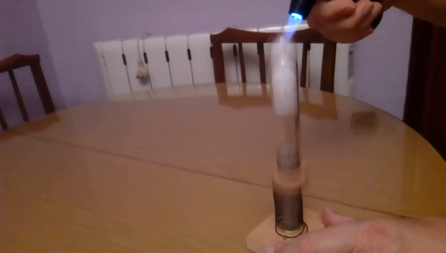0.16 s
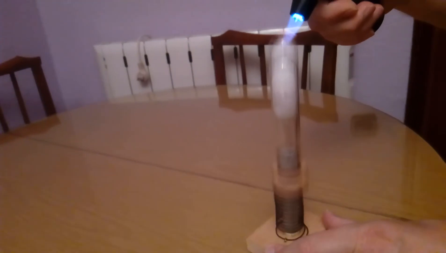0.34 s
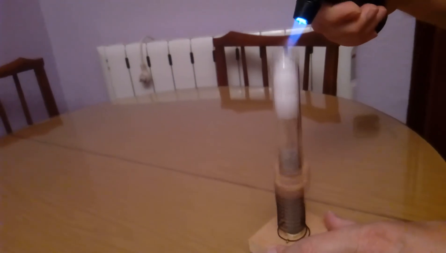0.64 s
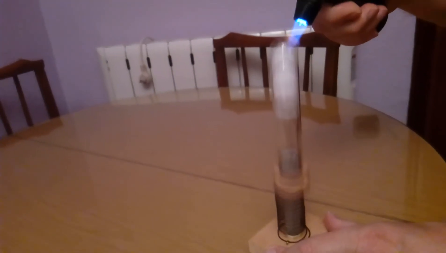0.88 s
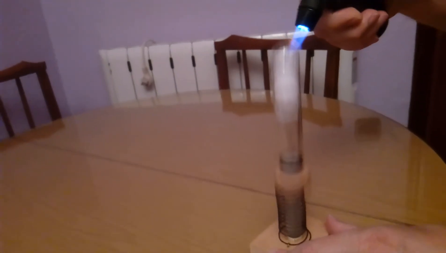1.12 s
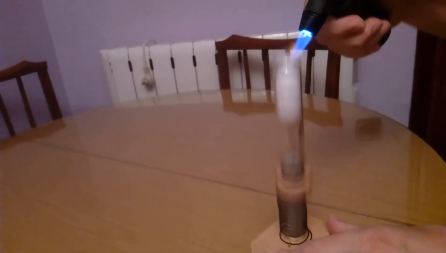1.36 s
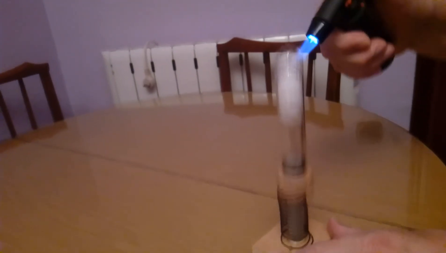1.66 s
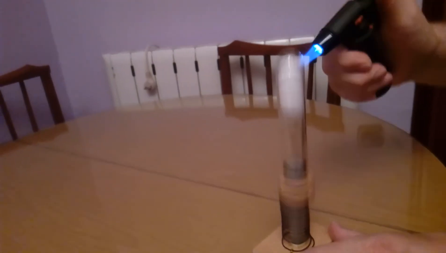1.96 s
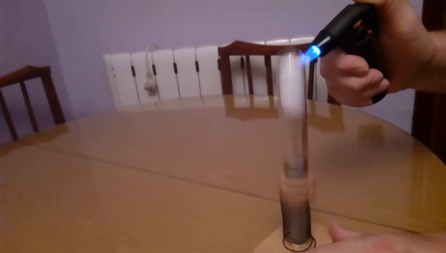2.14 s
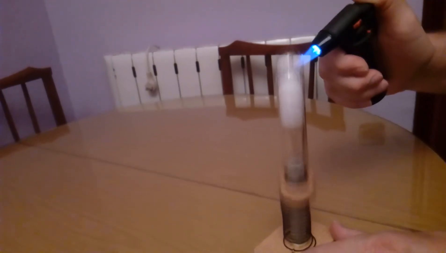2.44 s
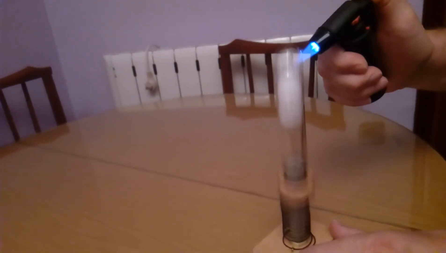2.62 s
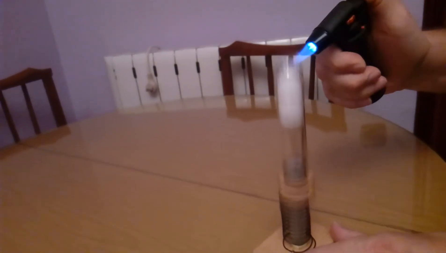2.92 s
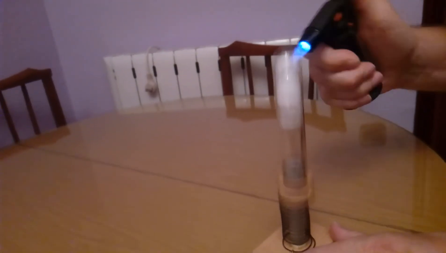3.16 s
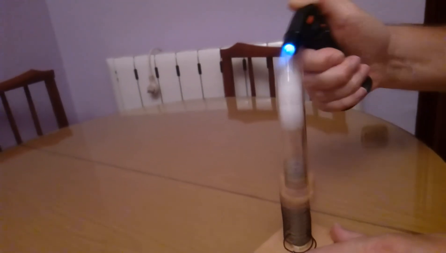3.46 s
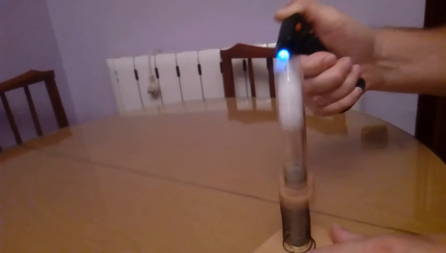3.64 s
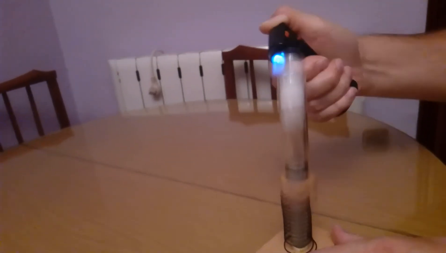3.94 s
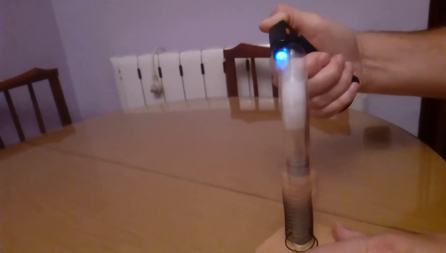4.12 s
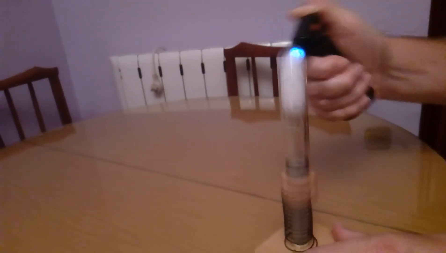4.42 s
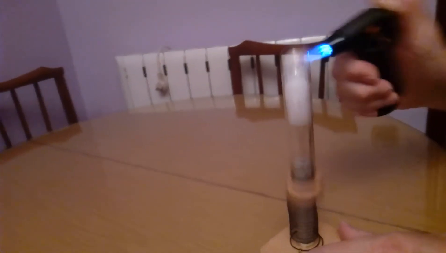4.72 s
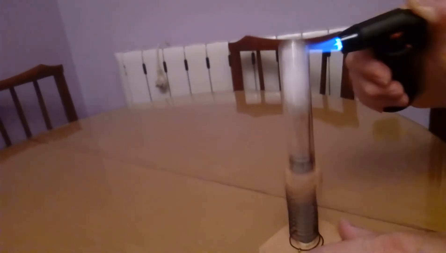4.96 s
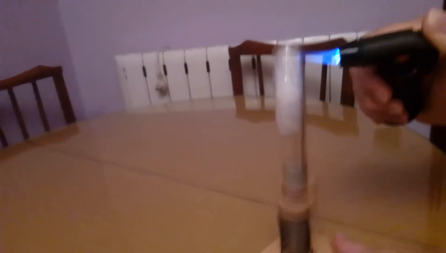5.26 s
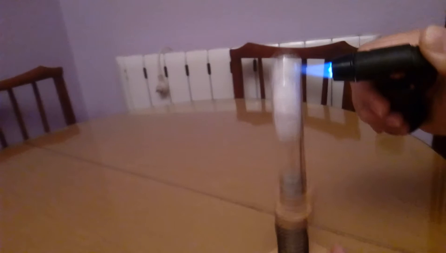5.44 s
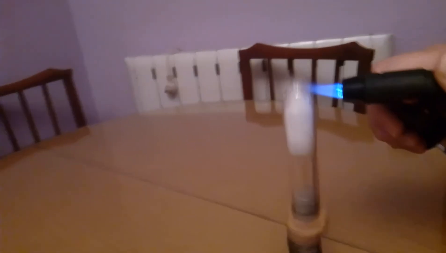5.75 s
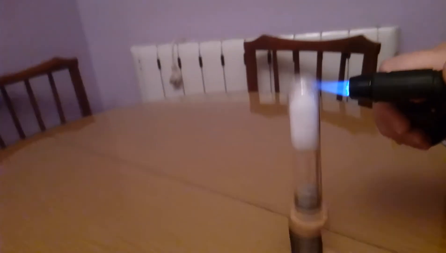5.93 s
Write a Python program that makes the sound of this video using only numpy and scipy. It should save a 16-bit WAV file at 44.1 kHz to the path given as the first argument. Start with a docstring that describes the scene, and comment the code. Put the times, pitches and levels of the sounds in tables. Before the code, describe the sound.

Rapid, dry, glassy clattering from a tiny free-piston engine on a wooden table, steady and very close, with faint gas flame hiss behind.

```python
"""A small room: a free-piston hot-air engine of glass tubes runs on a wooden table, heated by a hand torch.
Eleven times a second the piston slams one end stop, knocks the other and ticks the glass as it rebounds.
Each blow rings decaying modes of tube, base and table; random grains into the same modes make the scrape.
Echoes are decaying noise, the torch is shaped noise, the low hum is three wavering bands. Two close microphones."""
import sys
import numpy as np
from scipy import signal
from scipy.fft import rfft, irfft
from scipy.io import wavfile
from scipy.ndimage import uniform_filter1d

SR = 44100
rng = np.random.default_rng(int(sys.argv[2]) if len(sys.argv) > 2 else 0)


def voltage_ratio(decibels):
    """Convert decibels (scalar or array-like) to amplitude ratios, 20 dB per decade."""
    exponent = np.asarray(decibels, float) / 20
    return 10 ** exponent


def unload_wav(signal):
    """Save mono or channel-first audio to the path in sys.argv[1] as 16-bit WAV at rate SR, clipped to [-1, 1]."""
    wavfile.write(
        sys.argv[1],
        SR,
        np.round(np.clip(np.atleast_2d(signal).T, -1, 1) * 32767).astype(np.int16),
    )


N = 269010
LEFT_LAG_S = 5.5e-5

# blows on the upper stop:
# (time [s], level [dB], crack 2.9-5.3 kHz [dB re level], top ping [dB re level])
UPPER_STOP_BLOWS = [(0.0226, -22.2, -5, -5), (0.1121, -14, 1, -9), (0.2031, -19.5, 0.3, -10),
                    (0.2936, -17, -5.5, -14), (0.384, -20, 0.5, -8), (0.4767, -18, 1.5, -6.5),
                    (0.5674, -13.5, -3, -10.5), (0.6602, -17.5, 0.5, -6.1), (0.7517, -15.5, -8, -24),
                    (0.8452, -19.5, 0.5, -10), (0.9347, -12, -10, -17), (1.0271, -19.5, 1, -3.5),
                    (1.1166, -18, 2, -5), (1.2073, -17.5, 1, -2.5), (1.2959, -17.5, 0.5, -3.5),
                    (1.3887, -18, 0.6, -4), (1.477, -16.5, -1.0, -8), (1.5693, -15.5, -16, -16.8),
                    (1.6628, -16.5, -0.4, -11), (1.752, -13, -12, -22), (1.8438, -15, -7, -15),
                    (1.9394, -15.5, -4, -13), (2.028, -14.5, -1.3, -10.5), (2.1171, -14, 0.2, -14),
                    (2.2086, -20.5, -1.5, -13), (2.3036, -20, -4, -16), (2.392, -21.5, -3, -16),
                    (2.4832, -13, -3.0, -8.5), (2.5739, -17, -1, -14), (2.6633, -21, 2.4, -4.2),
                    (2.7582, -18, 2.3, -6), (2.8511, -15, -19.2, -15.3), (2.9454, -18, 0.5, -16),
                    (3.032, -20, 1.8, -7), (3.123, -19.1, 2, -8.3), (3.2138, -21.7, -1.5, -9),
                    (3.3038, -14.5, -10.5, -18), (3.3938, -19.5, 0.8, -8.5), (3.4853, -12.5, -0.5, -11.2),
                    (3.5798, -13, -5, -14.5), (3.6701, -21, 1.9, -1.4), (3.7613, -26.5, 1.1, -6),
                    (3.8529, -18, 1.4, -8), (3.9419, -19, -0.5, -2.5), (4.0327, -12, -3.5, -10),
                    (4.125, -17.1, 1.3, -7.5), (4.2172, -17.5, 1.6, -5.5), (4.3065, -15.5, -12, -34.7),
                    (4.398, -17.5, -2, -17), (4.4917, -15, -3, -19.5), (4.5834, -18, -0.5, -10),
                    (4.6758, -14.0, 0, -11), (4.768, -20.5, 0, -11), (4.8568, -14.5, -6, -14.4),
                    (4.9465, -21, 2.0, -6), (5.0383, -17.5, 0.7, -4.8), (5.1299, -18, 1.8, -5),
                    (5.221, -16, -2.5, -10), (5.3108, -18.5, 2, 1), (5.4031, -18.5, 1.5, -0.5),
                    (5.4966, -22, -1, -7), (5.5907, -22, 1.5, 3), (5.6816, -19, 0.9, 2.1),
                    (5.7781, -21.5, 0.5, 0), (5.87, -22, -2, -6), (5.9603, -22, 0.5, -10),
                    (6.0533, -22, -5.7, -10)]


def slams():
    """Upper-stop times and band levels; thud and glass grow less than the blow, a dull blow rings less glass."""
    time_s, level_db, crack_db, ping_db = np.transpose(UPPER_STOP_BLOWS)
    thud_db, glass_db = colours(len(time_s), (-3.5, 3.4), (-11.5, 3.2))
    above_usual_db = level_db + 17.5
    thud_db = thud_db - 0.33 * above_usual_db
    glass_db = glass_db - 0.15 * above_usual_db + 0.22 * crack_db
    return time_s, (level_db + np.array([thud_db, 0 * time_s, crack_db, glass_db, ping_db])).T


# blows on the lower stop, each with its rebound on the glass:
# (time [s], level [dB], rebound delay [ms], rebound glass level [dB])
LOWER_STOP_BLOWS = [(0.0578, -29.5, 8.5, -33), (0.1488, -30, 6.9, -29), (0.2392, -31, 9.8, -31),
                    (0.3334, -30.5, 5.8, -30), (0.4239, -30, 3.3, -31), (0.5132, -31.5, 2.9, -36.9),
                    (0.607, -32, 5.7, -33.2), (0.6951, -32.5, 6.2, -29), (0.7896, -31.5, 2.2, -33.5),
                    (0.8782, -32, 3.2, -26), (0.9706, -31, 6.5, -35.5), (1.0598, -34.5, 6.8, -23),
                    (1.153, -29.5, 1.9, -29.4), (1.2415, -31, 4.9, -21.5), (1.3336, -29, 3, -29),
                    (1.4237, -35, 3.6, -20), (1.516, -31.5, 1.9, -30), (1.6068, -28.5, 3.1, -35),
                    (1.6963, -34, 3.3, -23.5), (1.7891, -29.2, 2.7, -22.9), (1.879, -31, 5.7, -29),
                    (1.9705, -34, 1.8, -41), (2.0618, -32.5, 11.3, -26), (2.1532, -33, 1.96, -27.5),
                    (2.2465, -28, 2.15, -24), (2.3374, -33, 2.9, -44), (2.4292, -33, 2.0, -51),
                    (2.519, -32.5, 2.0, -39.8), (2.6131, -31, 5.2, -25.5), (2.7029, -32.8, 2.8, -30),
                    (2.7928, -31.5, 7.5, -28.5), (2.885, -33, 6.1, -35), (2.9771, -32, 10.8, -42),
                    (3.068, -29, 3.45, -26.5), (3.1592, -33, 4.2, -23.5), (3.2506, -30.5, 8, -43.6),
                    (3.3435, -32.5, 5.6, -30.3), (3.4343, -30.0, 6.3, -27), (3.524, -33.5, 2.2, -29),
                    (3.6156, -28.9, 2.5, -25.5), (3.7067, -33.5, 10.1, -24.5), (3.7986, -31.5, 3.9, -25.5),
                    (3.8872, -32, 6.5, -25), (3.9796, -32, 6.9, -30), (4.0726, -32.5, 6.5, -27.8),
                    (4.1642, -27.5, 1.9, -26.5), (4.2558, -27.5, 7.1, -25.5), (4.348, -31, 2.6, -35.1),
                    (4.44, -32, 6.6, -33), (4.5314, -32.5, 5.1, -36), (4.6211, -31.5, 6.3, -26.5),
                    (4.7099, -34.5, 7.0, -26.5), (4.8034, -32.5, 10.5, -23), (4.8969, -30, 5.9, -22.5),
                    (4.9876, -32, 3.6, -27.5), (5.0798, -31, 5.4, -27.5), (5.1712, -27, 6.2, -27),
                    (5.2626, -27, 3.5, -26), (5.3542, -30.5, 1.9, -33.3), (5.446, -29, 4.1, -28),
                    (5.5355, -31.5, 2.3, -36), (5.6247, -30.5, 3.65, -27.3), (5.719, -32, 2.4, -23.5),
                    (5.8092, -32, 6.4, -27.5), (5.901, -35.5, 2.2, -44), (5.9935, -32, 10, -37),
                    (6.0855, -33.5, 4.1, -34.5)]


def knocks():
    """Lower-stop times and band levels."""
    time_s, level_db = np.transpose(LOWER_STOP_BLOWS)[:2]
    thud_db, crack_db, glass_db, ping_db = colours(len(time_s), (0, 2.26), (-6.5, 4.3), (-9, 5), (-10.5, 4.3))
    return time_s, (level_db + np.array([thud_db, 0 * time_s, crack_db, glass_db, ping_db])).T


def rebounds():
    """Times and band levels of the glass ticks, a few ms after each knock."""
    time_s, _, delay_ms, glass_db = np.transpose(LOWER_STOP_BLOWS)
    crack_db, ping_db = colours(len(time_s), (-7.5, 3.95), (-19, 3))  # re glass level
    bands_db = np.array([crack_db, crack_db, crack_db, 0 * time_s, ping_db])
    return time_s + delay_ms / 1000, (glass_db + bands_db).T


def colours(count, *rules):
    """One random dB offset per blow for each (mean dB, scatter dB) rule."""
    mean_db, scatter_db = np.transpose(rules)
    return (mean_db + scatter_db * rng.standard_normal((count, len(rules)))).T


# borders of the five bands thud, body, crack, glass, ping: (frequency [Hz])
BAND_BORDERS_HZ = [1450, 2900, 5350, 8000]
# ringing modes of tube, base and table:
# (frequency [Hz], t60 [ms], left minus right level [dB], left minus right phase [rad],
#  slam gain [dB], knock gain [dB], tick gain [dB])
MODES = [(783, 4.2, -6, 0.09, -6.5, 12, 3.5), (1163, 31, -2, -0.0051, -37, -6.5, -4.5),
         (1330, 4.92, -1.5, -0.32, -1, 19.5, -21), (1780, 6.4, 7, -0.18, 3, 9.5, 8),
         (2179, 4.59, -0.5, -0.21, 16, 11, 12), (2463, 3.05, -1, 0.22, 8.5, 23, -2),
         (3382, 3.66, -8, 0.12, 13.5, 13, -23), (4000, 2.32, 6, 0.14, 16.5, 18, -20),
         (4780, 2.8, 7, 1.4, 9.5, 22, -13), (5361, 5.57, 0, 0.069, 10, 11.5, 4),
         (5874, 24.7, 8, -0.16, 3.5, -23, 4), (7500, 2.1, 13.5, -0.88, 0.5, -1, -4),
         (9836, 3.54, -1, -0.13, 14.5, 17, 6), (12770, 4.7, -12, -0.69, -9.5, 4, -8)]
# slams in which the piston lands on two edges in turn: (time [s])
TWO_EDGE_SLAMS_S = [.112, .567, 2.028, 2.117, 2.945, 3.58, 4.676]


def blows(times_s, bands_db, column, early_ms, push_ms, touch_ms, touch_db, bounce_ms, bounce_db, doubles_s=()):
    """Each blow rings the modes in its own balance, between a lighter first touch and a small bounce."""
    hz, t60_ms, lean_db, usual_lead = np.transpose(MODES)[:4]
    band = np.searchsorted(BAND_BORDERS_HZ, hz)
    t = np.arange(2600) / SR
    contact_s = 0.002  # main contact within the snippet
    shifts = (t60_ms < 20) * (hz < 5700)  # dull modes shift with the spot hit, glass keeps its pitch
    out = np.zeros((2, N + len(t)))
    for time_s, band_db in zip(times_s, bands_db):
        chance = rng.standard_normal((3, len(hz)))
        # random left-right phase for each blow, wider in the treble
        lead = usual_lead + 0.69 * chance[2] * hz / 10000
        gain = voltage_ratio(band_db[band] + np.array(MODES)[:, 4 + column])
        pitch = hz * (1 + 0.015 * chance[0] * shifts)
        touch_s, bounce_s = np.array([touch_ms, bounce_ms]) / 1000 * np.exp(0.3003 * chance[1, :2])
        touch_gain = gain * voltage_ratio(touch_db + 3.6 * chance[1, 2])
        bounce_gain = gain * voltage_ratio(bounce_db + 4.7 * chance[1, 3])
        after = t - contact_s
        sound = ring(pitch, t60_ms, lean_db, lead, gain, after, push_ms)
        sound -= ring(pitch, t60_ms, lean_db, lead, touch_gain, after + touch_s, push_ms)
        sound += ring(pitch, t60_ms, lean_db, lead, bounce_gain, after - bounce_s, 2 * push_ms)
        if any(abs(time_s - d) < 0.005 for d in doubles_s):
            # first edge 0.367 ms earlier; each edge takes part of the force
            sound -= ring(pitch, t60_ms, lean_db, lead, gain * voltage_ratio(-1.5), after + 0.000367, push_ms)
            sound *= voltage_ratio(-3)
        start = int((time_s - contact_s - early_ms / 1000) * SR)
        out[:, start:start + len(t)] += sound
    return out[:, :N]


def ring(hz, t60_ms, lean_db, lead_rad, gain, t, push_ms):
    """Sum of modes after one contact; force builds up over the push, the left microphone hears it later."""
    side = np.array([0.5, -0.5])[:, None, None]
    t = np.maximum(t - side * LEFT_LAG_S, 0)
    wave = np.sin(2 * np.pi * hz[:, None] * t + side * lead_rad[:, None])
    wave = wave * voltage_ratio(side * lean_db[:, None])
    build_up = 1 - np.exp(-(t * 1000 / push_ms) ** 2)
    return (gain[:, None] * decay(t, t60_ms[:, None] / 1000) * wave * build_up).sum(axis=1)


def decay(t, t60_s):
    """Exponential fall of 60 dB in t60_s."""
    return np.exp(-np.log(1000) * t / t60_s)


def scrape():
    """Piston rattles on the glass, most after each blow and before the lower stop: grains into the modes."""
    hz, t60_ms, lean_db, lead = np.transpose(MODES)[:4]
    t = np.arange(3000) / SR
    after_blows = force(UPPER_STOP_BLOWS, 11.0) + force(LOWER_STOP_BLOWS, 16.5)
    shake = signal.fftconvolve(after_blows, decay(t, 0.034))[:N]
    # time-reversed decay: rises towards each knock
    shake += signal.correlate(force(LOWER_STOP_BLOWS, 4.0), decay(t, 0.023))[len(t) - 1:]
    shake += voltage_ratio(-17.5)  # light rub all along the stroke
    grains_per_s = 2500
    grains = (rng.random(N) < grains_per_s / SR) * rng.standard_normal(N) * np.abs(shake)
    gain_db = np.array(MODES)[:, 4] - 5.1 * (hz > 8000) + 1.2 * (t60_ms > 20) * (hz > 5700)
    body = ring(hz, t60_ms, lean_db + 1, lead, voltage_ratio(gain_db), t, push_ms=0.062)
    return voltage_ratio(-45.5) * signal.fftconvolve(grains[None], body, axes=1)[:, :N]


def force(table, gain_db):
    """Impulse train of the blows, at half their level in dB."""
    time_s, level_db = np.transpose(table)[:2]
    train = np.zeros(N)
    train[(time_s * SR).astype(int)] = voltage_ratio(0.5 * level_db + gain_db)
    return train


# reflection off a thing by the table: (delay [ms], left gain [dB], right gain [dB])
TABLE_REFLECTIONS = [(5.0, -17.5, -36)]


def near(x):
    """Single early reflection; a small surface returns neither bass nor the very top."""
    x = signal.sosfilt(signal.butter(1, [1800, 6500], "band", fs=SR, output="sos"), x)
    out = np.zeros_like(x)
    for delay_ms, *gain_db in TABLE_REFLECTIONS:
        lag = int(delay_ms * SR / 1000)
        out[:, lag:] += voltage_ratio(np.array(gain_db))[:, None] * x[1, :-lag]
    return out


def room(x):
    """Room echoes: a steadily turning blend of three noise patterns, livelier on the left."""
    turn = np.cumsum(rng.random(N)) * 2 * np.pi * 7 / SR  # 3.5 turns/s on average
    blend = [np.cos(turn), np.sin(turn) * np.cos(turn / np.e), np.sin(turn) * np.sin(turn / np.e)]
    wet = sum(signal.fftconvolve((x[1] * share)[None], echoes(), axes=1)[:, :N] for share in blend)
    left_lean_db = 1.5
    return voltage_ratio(-16.5 + left_lean_db * np.array([[0.5], [-0.5]])) * wet


# echo decay by octave: (centre [Hz], t60 [s], relative gain [dB])
ROOM_OCTAVES = [(278, 0.93, -24.5), (659, 0.89, -26), (1330, 0.32, -27), (2950, 0.31, -25),
                (6310, 0.27, -18), (10600, 0.067, -26)]


def echoes():
    """Dense echoes as decaying octave noise, more alike at both microphones in the bass; treble dies first."""
    t = np.arange(SR // 2) / SR
    tail = np.zeros((2, len(t)))
    for hz, t60_s, gain_db in ROOM_OCTAVES:
        octave = signal.butter(3, [hz / np.sqrt(2), hz * np.sqrt(2)], "band", fs=SR, output="sos")
        shared = rng.standard_normal(len(t))
        own = rng.standard_normal((2, len(t)))
        noise = signal.sosfilt(octave, own + min(700 / hz, 3) * shared)
        tail += voltage_ratio(gain_db) * decay(t, t60_s) * noise
    return tail * (1 - np.exp(-(t / 0.0032) ** 2))  # first walls answer after a few ms


# torch hiss spectrum: (frequency [Hz], relative density [dB])
TORCH_SPECTRUM = [(25, -7), (90, -13), (155, -2.5), (310, -15), (500, -10), (1200, -2), (2200, -5.5),
                  (4400, -12.5), (6500, -24), (8300, -69), (10000, -25), (11400, -36), (14400, -20.5),
                  (16000, -52)]


def flame():
    """Torch jet: soft wavering hiss, partly direct (later at the left microphone), partly diffuse."""
    direct = coloured(TORCH_SPECTRUM)
    pair = np.array([np.roll(direct, round(LEFT_LAG_S * SR)), direct])
    diffuse = np.array([coloured(TORCH_SPECTRUM), coloured(TORCH_SPECTRUM)])
    # long waves reach both microphones alike
    diffuse = signal.sosfilt(signal.butter(1, 500, "high", fs=SR, output="sos"), diffuse)
    gain_db = -44.5 + 1.0 * walk(3.0) + 2.0 * walk(23.97)
    return voltage_ratio(gain_db) * (0.63 * pair + 1.35 * diffuse)


def coloured(points):
    """Noise of rms 1 with a spectrum through (Hz, dB) points."""
    hz, db = np.transpose(points)
    f = np.fft.rfftfreq(N, 1 / SR)
    shape_db = np.interp(np.log(f + 1), np.log(hz), db)
    x = irfft(rfft(rng.standard_normal(N)) * voltage_ratio(shape_db), N)
    return x / x.std()


def walk(steps_per_s):
    """Slow random drift about 0, rms about 0.3: twice-smoothed random steps."""
    k = int(SR / steps_per_s)
    steps = np.repeat(rng.standard_normal(N // k + 1), k)
    return 0.39 * uniform_filter1d(uniform_filter1d(steps, k), k)[:N]


# hum bands: (centre [Hz], width [Hz], gain [dB])
HUM_LINES = [(133.3, 9.1, -64.5), (201.4, 10, -61.5), (249, 36, -63.5)]


def hum():
    """Low hum: three narrow bands that waver, swell and fade, the same at both microphones."""
    t = np.arange(N) / SR
    f = np.fft.rfftfreq(N, 1 / SR)
    out = 0
    for hz, width_hz, gain_db in HUM_LINES:
        waver = irfft(rfft(rng.standard_normal((2, N))) / (1 + (f / width_hz * 2) ** 4), N)
        waver /= waver.std()
        in_phase = (0.63 + 0.7 * waver[0]) * np.sin(2 * np.pi * hz * t)
        quadrature = 0.93 * waver[1] * np.cos(2 * np.pi * hz * t)
        out = out + voltage_ratio(gain_db + 5 * walk(2.47)) * (in_phase + quadrature)
    return out


def scene():
    """Engine close by, then its echoes, the hum and the flame."""
    engine = blows(*slams(), column=0, early_ms=0.3, push_ms=0.16, touch_ms=0.4354, touch_db=-13.0,
                   bounce_ms=1.8, bounce_db=-17, doubles_s=TWO_EDGE_SLAMS_S)
    engine += blows(*knocks(), column=1, early_ms=0.4, push_ms=0.29, touch_ms=0.428, touch_db=-10.5,
                    bounce_ms=1.405, bounce_db=-7)
    engine += blows(*rebounds(), column=2, early_ms=0.088, push_ms=0.08, touch_ms=0.391, touch_db=-9,
                    bounce_ms=2.4, bounce_db=-5)
    engine += scrape()
    # too small to radiate bass
    engine = signal.sosfilt(signal.butter(2, 480, "high", fs=SR, output="sos"), engine)
    return engine + near(engine) + room(engine) + hum() + flame()


def band_limit(x):
    """A steep low-pass at the top of the band."""
    return signal.sosfilt(signal.butter(12, 16520, fs=SR, output="sos"), x)


def record(dry):
    """Peaks clip at full scale; the microphones lose the deep bass below 55 Hz."""
    low_cut = signal.butter(1, 55, "high", fs=SR, output="sos")
    x = signal.sosfilt(low_cut, np.clip(dry, -1, 1))
    return band_limit(np.clip(x, -1, 1))


dry = scene()
out = record(dry)
unload_wav(out)
```